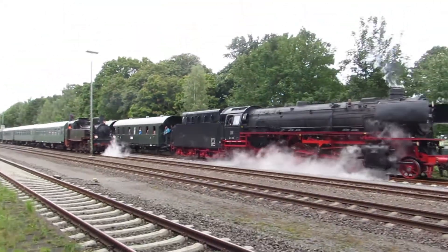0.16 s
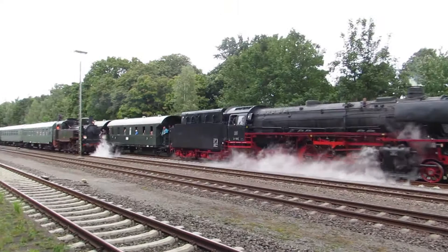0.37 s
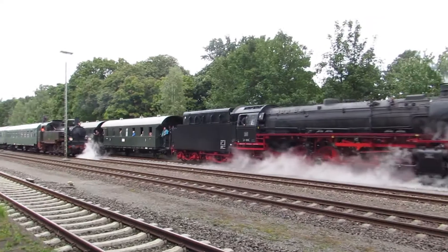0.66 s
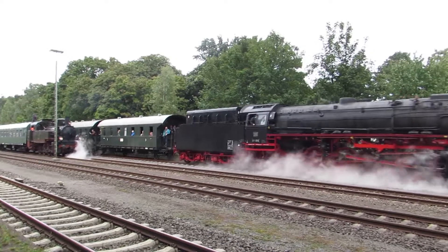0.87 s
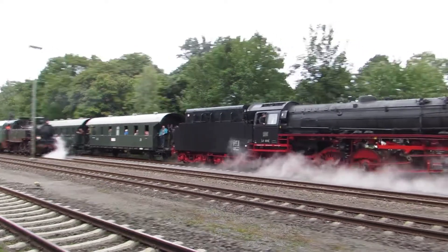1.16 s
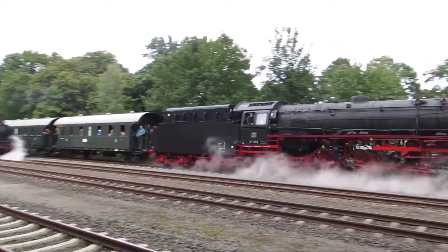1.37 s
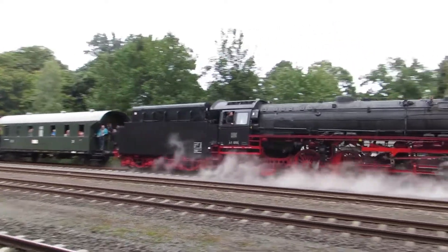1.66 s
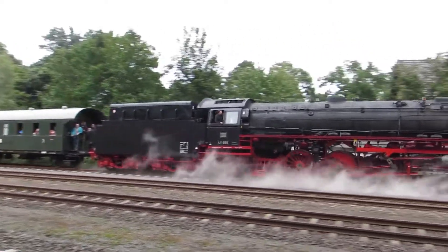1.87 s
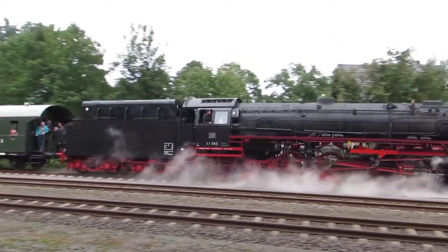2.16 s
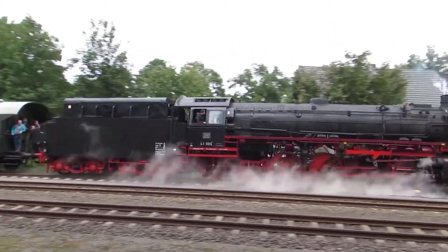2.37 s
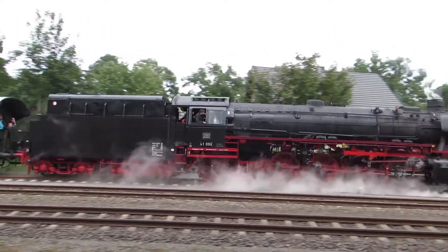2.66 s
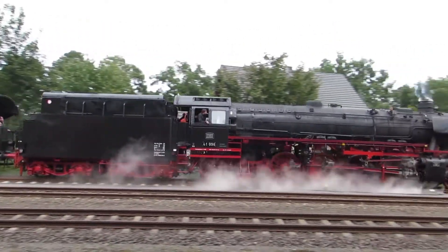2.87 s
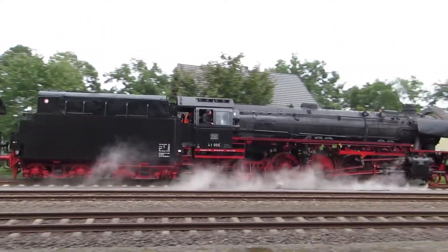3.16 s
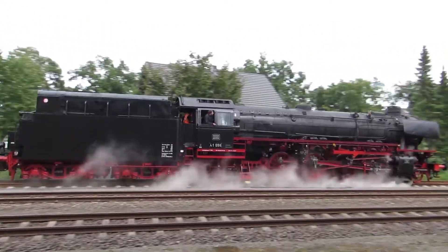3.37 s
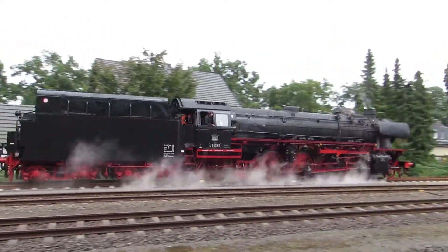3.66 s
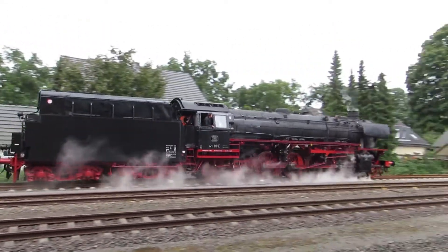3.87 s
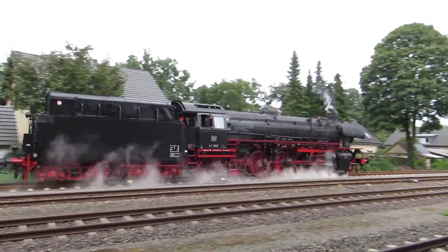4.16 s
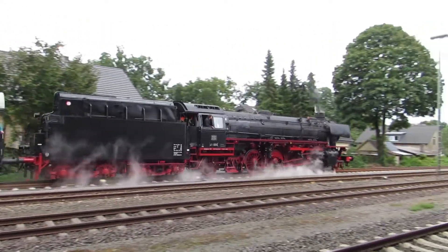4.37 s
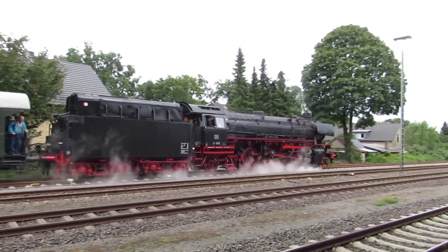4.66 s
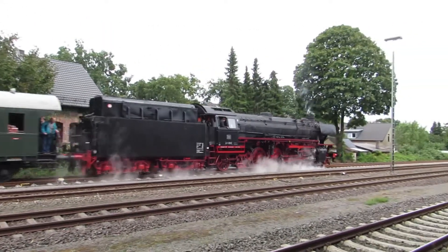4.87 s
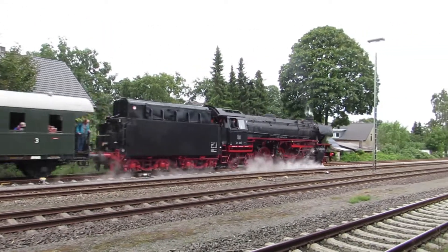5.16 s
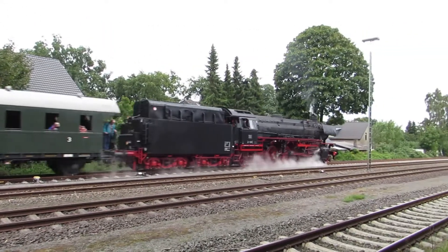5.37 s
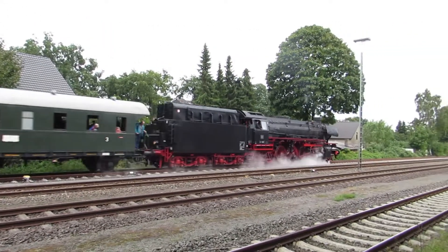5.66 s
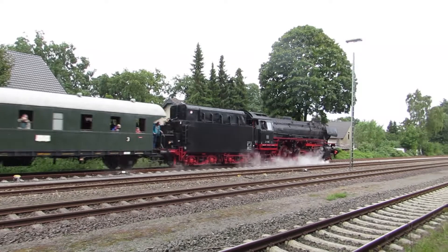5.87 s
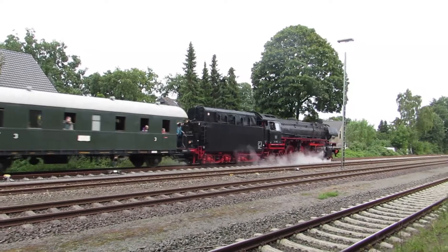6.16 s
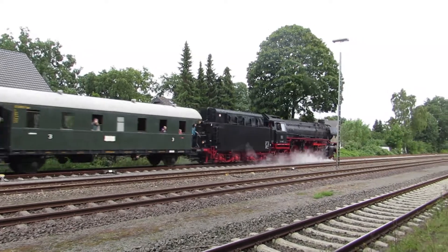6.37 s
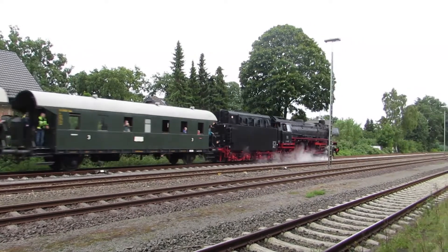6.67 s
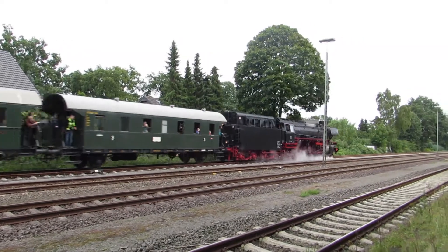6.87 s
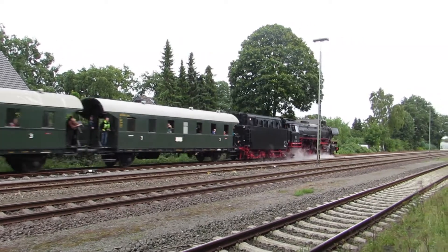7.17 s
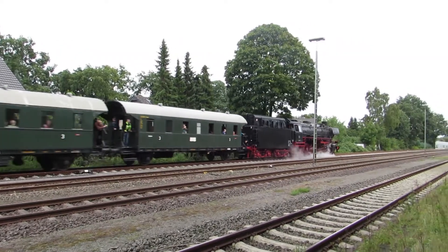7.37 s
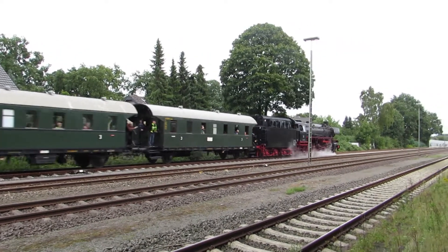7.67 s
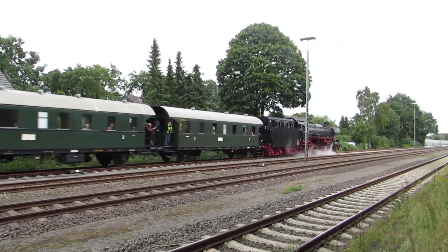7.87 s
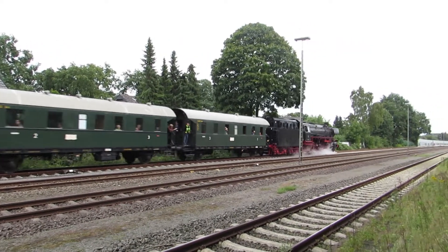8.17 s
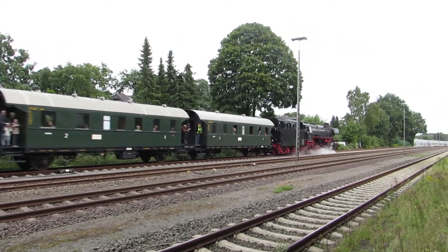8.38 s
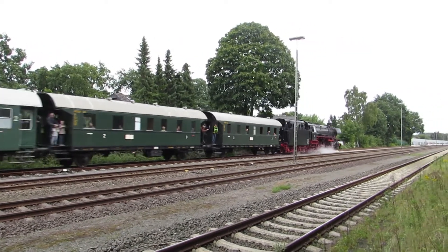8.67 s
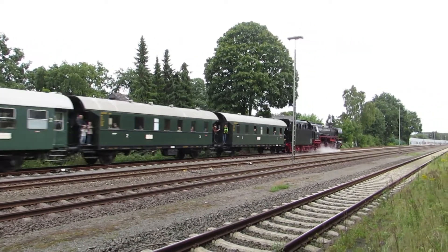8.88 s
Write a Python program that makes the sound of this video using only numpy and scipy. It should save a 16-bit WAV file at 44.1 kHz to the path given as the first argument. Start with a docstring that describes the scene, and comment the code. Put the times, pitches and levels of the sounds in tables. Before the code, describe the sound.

Outdoors beside railway tracks, a steam locomotive passes close and moves away. Deep, hollow chuffs come about six a second, each with a short tearing roar. Leaking steam hisses in waves, with sharp spits on every second chuff. Low wheel rumble builds as coaches follow, with a faint metallic ringing in the later part. A camera microphone hears it brighter on the right, duller on the left.

```python
"""A two-cylinder steam locomotive draws a train past and away across a gravel yard.
Four exhaust chuffs a wheel turn boom in the chimney: each is noise ringing in three notes, under a tearing roar.
Steam leaks and spits at the cylinders as shaped hiss; wheels on rail rumble, sing and ring as filtered noise.
A camera microphone gives the sound on the right and a dull, inverted copy on the left, with faint stray noise."""
import sys
import numpy as np
from scipy import signal
from scipy.fft import rfft, irfft, next_fast_len
from scipy.io import wavfile
from scipy.ndimage import uniform_filter1d

SR = 44100
rng = np.random.default_rng(int(sys.argv[2]) if len(sys.argv) > 2 else 0)


def wav_out(sig):
    """Save sig, one row per channel (or a flat mono array), as 16-bit PCM at SR to the path in sys.argv[1]."""
    wavfile.write(sys.argv[1], SR, np.round(np.clip(np.atleast_2d(sig).T, -1, 1) * 32767).astype(np.int16))


def invert_db(level):
    """Linear amplitude ratio for a level in decibels (20 dB per decade), elementwise."""
    return 10 ** (np.asarray(level, dtype=float) / 20)


N = 397782  # length in samples

# wheels on rail over time: [t/s, rumble level/dB at 120-430 Hz, rail singing level/dB at 1300-1800 Hz,
# ground thunder level/dB at 25-110 Hz]
ROLLING = [(0, -33.5, -53, -36), (0.4, -28, -49.5, -36), (1.6, -28.5, -50.5, -30.5),
           (2.4, -26.5, -48.5, -24.5), (2.9, -27, -47.5, -30), (3.9, -27, -47.5, -26.5),
           (4.4, -27, -45.5, -33), (4.9, -25.5, -43.5, -27), (6, -26, -43, -28.5), (6.7, -24, -39.5, -25),
           (7.2, -26.5, -41, -27), (7.7, -24.5, -40.5, -29.5), (8.4, -24, -38.5, -29),
           (8.9, -20.5, -37, -35)]


def amp_of(points, x):
    """Reads gain from an [f/Hz, level/dB] table on a log frequency axis; silent above its last row."""
    f, db = np.transpose(points)
    return invert_db(np.interp(np.log(x + 1), np.log(f + 1), db, right=-150))


def curve(rows, t, axis=1):
    """Reads one column of a time table, with straight lines between the rows."""
    rows = np.array(rows)
    return np.interp(t, rows[:, 0], rows[:, axis])


def evened(x):
    """Scales to an rms of 1."""
    return x / np.sqrt(np.mean(x ** 2) + 1e-20)


def noise(colour, band, size, patchy_db, extra_db=None):
    """Turbulent noise: random short spectra, shaped by colour, with drifting patches; rms about 1 inside band/Hz."""
    hop = size // 4
    hz = np.fft.rfftfreq(size, 1 / SR)
    t = np.arange(N // hop + 5) * hop / SR
    real, imaginary, patches = rng.standard_normal((len(t), len(hz), 3)).T
    # smoothing over frequency, then over time, joins neighbours into patches
    patches = uniform_filter1d(patches, size=6, axis=0)
    patches = evened(uniform_filter1d(patches, size=8, axis=1))
    shape = amp_of(colour, hz)[:, None]
    if extra_db:
        shape = shape * invert_db(extra_db(hz[:, None], t))
    inside = (hz > band[0]) & (hz < band[1])
    shape = shape / np.sqrt((shape[inside] ** 2).sum(0))
    spectra = (real + 1j * imaginary) * shape * invert_db(patchy_db * patches)
    x = signal.istft(spectra, nperseg=size, noverlap=size - hop)[1][:N]
    whole_over_band = np.sqrt((shape ** 2).sum(0).mean())
    return evened(x) * whole_over_band


def resonance(drive, width_hz):
    """Two equal one-pole filters turn complex noise into the slow wavering of a resonance."""
    r = np.exp(-np.pi * width_hz / SR)
    return signal.lfilter([1], np.convolve([1, -r], [1, -r]), drive)


def burst(hold_s, rise_s, tail_s):
    """A pressure puff: soft rise, a hold counted from its start, then an exponential fall."""
    t = np.arange(round(.3 * SR)) / SR
    rise = np.sin(np.pi / 2 * np.clip(t / rise_s, 0, 1)) ** 2
    return rise * np.exp(-np.maximum(t - hold_s, 0) / tail_s)


def add(mix, s, sound):
    """Mixes a sound in at time s (seconds)."""
    part = mix[max(round(s * SR), 0):][:len(sound)]
    part += sound[:len(part)]


def thunder_and_rumble():
    """The weight of the train shakes the ground and the wheels rumble: two bands of low noise."""
    # relative colour of the ground thunder: [f/Hz, level/dB]
    thunder_colour = [(12, -0.5), (28, 4.5), (45, 2), (62, 10.5), (85, 2), (115, 0.5), (160, -36),
                      (250, -53)]
    # relative colour of the wheel rumble: [f/Hz, level/dB]
    rumble_colour = [(60, -1), (100, -0.5), (140, 2), (200, -4.5), (245, -6), (310, -4), (400, -9),
                     (490, -24), (750, -20), (1000, -23), (1200, -27), (2000, -47)]
    t = np.arange(N) / SR
    thunder = invert_db(curve(ROLLING, t, axis=3)) * noise(thunder_colour, (25, 110), size=4096, patchy_db=2.0)
    rumble = invert_db(curve(ROLLING, t)) * noise(rumble_colour, (120, 430), size=2048, patchy_db=1.0)
    return thunder + rumble


def wheel_ring():
    """A wheel rings as the coaches roll by: a narrow band of noise that slides in pitch."""
    # the ringing note: [t/s, f/Hz, level over the rail singing/dB]
    ring_path = [(5.8, 1593, -12), (6.5, 1592, -4), (6.9, 1565, -10), (7.3, 1580, -9), (7.7, 1640, -4),
                 (8.05, 1654, -6), (8.45, 1650, -8), (9.02, 1613, -4)]
    t = np.arange(N) / SR
    real, imaginary = rng.standard_normal((2, N))
    wavering = resonance(real + 1j * imaginary, width_hz=32)
    phase = 2 * np.pi * np.cumsum(curve(ring_path, t)) / SR
    ring = evened((wavering * np.exp(1j * phase)).real)
    fade_in = np.clip(t - ring_path[0][0], 0, 1)  # over one second from the first row
    return ring * invert_db(curve(ring_path, t, axis=2)) * fade_in


def rails():
    """Rolling wheels make the rails sing: a band of noise, with the wheel ring on top."""
    # relative colour of the singing rails: [f/Hz, level/dB]
    rail_colour = [(900, -25), (1220, -11), (1360, 6), (1450, 2.5), (1530, 6), (1640, 4), (1750, -0.5),
                   (2000, -2.5), (2200, -1), (2550, -3.5), (3000, -8), (3350, -13), (4200, -10)]
    t = np.arange(N) / SR
    singing = noise(rail_colour, (1300, 1800), size=2048, patchy_db=0.84)
    return invert_db(curve(ROLLING, t, axis=2)) * (singing + wheel_ring())


def air_db(hz, s):
    """Distance dulls the hiss: air takes more from the high pitches, with the square of frequency."""
    # air loss as the engine moves: [t/s, loss at 11 kHz/dB]
    air_loss = [(0, 6.5), (3, 6), (5, 6.5), (7, 8.5), (9.1, 9.5)]
    return -curve(air_loss, s) * (hz / 11000) ** 2


def leak_db(t):
    """Leak level over each turn: cut-off, reopening, plateau, swell to a peak, sag, fall to the next cut-off."""
    # one wheel turn a row, levels at 9-13 kHz: [cut-off t/s, cut-off level/dB, reopening level/dB,
    # plateau level/dB, peak level/dB]
    turns = [(-0.3, -51, -45, -51, -41), (0.35, -55, -48, -42.5, -41.5), (1.016, -52.5, -44, -44, -39),
             (1.655, -54, -52.5, -44.5, -39), (2.315, -52, -42.5, -42.5, -40),
             (2.958, -52, -45.5, -45, -41), (3.585, -53, -46.5, -48, -44),
             (4.215, -50.5, -48.5, -47.5, -43), (4.845, -51, -47.5, -46, -44), (5.47, -50.5, -49, -47, -45),
             (6.075, -50.5, -51, -47.5, -44.5), (6.685, -50, -48.5, -49, -48.5),
             (7.29, -52.5, -51, -49, -49), (7.897, -52.5, -52, -50.5, -49),
             (8.48, -51.5, -50.5, -49, -47.5), (9.1, -52, -50, -50, -48)]
    reopen_s, settle_s = 0.034, 0.095  # after the cut-off the leak snaps open, then settles
    swell, top, shoulder = 0.35, 0.55, 0.89  # shares of a turn
    sag = 0.48  # share of the fall done at the shoulder
    knots = []
    for (s, cut, reopen, plateau, peak), (end, next_cut, *_) in zip(turns, turns[1:]):
        turn_s = end - s
        knots += [(s, cut), (s + reopen_s, reopen), (s + settle_s, plateau)]
        knots += [(s + swell * turn_s, plateau), (s + top * turn_s, peak)]
        knots += [(s + shoulder * turn_s, peak + sag * (next_cut - peak))]
    return curve(knots + [turns[-1][:2]], t)


def steam_leak():
    """Steam escapes at the cylinders: a hiss that breathes once a wheel turn."""
    # shape of the hiss, with a steep top edge above 13.6 kHz that is not the steam's own: [f/Hz, level/dB]
    leak_shape = [(900, -1), (1500, -5), (2500, -1), (3500, -2), (4500, 3), (5900, 6.5), (7400, 3.5),
                  (8500, -1), (10500, 6), (12000, 4), (13000, 2), (13600, -5), (13900, -12), (14200, -28),
                  (14800, -50)]

    def colour_db(hz, s):
        """Air dulls the top; when pressure drops the lower hiss dies first."""
        pressure_db = leak_db(s) - uniform_filter1d(leak_db(s), size=450)
        return air_db(hz, s) + 0.091 * pressure_db * np.clip(1 - hz / 9500, 0, 1)

    hiss = noise(leak_shape, (9000, 13000), size=256, patchy_db=0.74, extra_db=colour_db)
    return invert_db(leak_db(np.arange(N) / SR)) * hiss


def steam_spits():
    """Drain cocks spit short jets as a stroke begins: sharp puffs open and close a hiss."""
    # the jets: [t/s, level/dB, length/s]
    spits = [(0.039, -39, 0.045), (0.372, -41, 0.045), (0.702, -35, 0.057), (1.024, -37, 0.069),
             (1.362, -36, 0.045), (1.683, -41, 0.045), (2.009, -31.5, 0.058), (2.322, -39, 0.06),
             (2.658, -35, 0.052), (2.974, -39.5, 0.05), (3.304, -37.5, 0.044), (3.618, -43, 0.054),
             (3.94, -39, 0.061), (4.25, -40, 0.067), (4.562, -40, 0.054), (4.882, -39.5, 0.07),
             (5.186, -35.5, 0.096), (5.496, -38.5, 0.068), (5.814, -37, 0.052), (6.115, -39, 0.062),
             (6.422, -36, 0.053), (6.738, -44, 0.062), (7.033, -39, 0.065), (7.343, -43, 0.054),
             (7.622, -36, 0.094), (7.93, -41.5, 0.04), (8.223, -40, 0.057), (8.523, -50, 0.035),
             (8.813, -44, 0.048)]
    # shape of the hiss of the jets, falling steeply at the top: [f/Hz, level/dB]
    spit_shape = [(1500, -16), (2500, -4.5), (3600, -11), (4600, -3), (5800, -1.5), (7200, -5), (8500, -16),
                  (12000, -6), (15000, -59)]
    gate = np.zeros(N)
    for s, db, length in spits:
        # the puff holds for only part of the length
        add(gate, s - .003, invert_db(db) * burst(0.65 * length, rise_s=0.0081, tail_s=0.013))
    return gate * noise(spit_shape, (4200, 7500), size=256, patchy_db=2.0, extra_db=air_db)


def chimney_note(drive, puff, hz, width_hz, firm):
    """Turbulence rings in one chimney resonance; the flow partly locks to it, so strength follows the puff."""
    slow = resonance(drive, width_hz)[-len(puff):]
    # a larger firm flattens the random swelling of the note
    power = abs(slow) ** 2
    slow = slow / (power + .1 * np.mean(power)) ** (np.clip(firm, 0, 1) / 2)
    x = (slow * np.exp(2j * np.pi * hz * np.arange(len(puff)) / SR)).real * puff
    return x * np.sqrt(np.sum(puff ** 4) / np.sum((x * puff) ** 2))  # same level for every draw


def blast_roar():
    """Steam tears out of the chimney: steady noise whose colour changes with the echo off the ground."""
    # relative colour of the tearing above the chimney notes: [f/Hz, level/dB]
    blast_colour = [(380, -12), (480, -4.5), (560, 1), (720, 2.5), (950, -1), (1150, -11), (1450, -10),
                    (2400, -14.5), (3600, -21), (5000, -18)]
    # the echo hollows the blast while the engine is near and fills in as it recedes:
    # [t/s, f/Hz, depth/dB (negative lifts)]
    hollow = [(0, 477, 3.5), (3.5, 477, 6.5), (4.8, 513, -5.5), (7, 507, -7), (9.1, 496, -1)]

    def hollow_db(hz, s):
        """A dip or lift that reaches half its depth in dB 70 Hz to either side."""
        return -curve(hollow, s, axis=2) / (1 + ((hz - curve(hollow, s)) / 70) ** 2)

    return noise(blast_colour, (500, 1100), size=1024, patchy_db=2.0, extra_db=hollow_db)


def exhaust():
    """Each release of steam up the chimney: two booming notes, a short throaty one and a tearing roar."""
    # the chuffs: [t/s, length/s, tearing blast level/dB, low note level/dB, upper note level/dB]
    chuffs = [(0.049, 0.094, -36.5, -25, -27), (0.222, 0.064, -34.5, -20.5, -23),
              (0.384, 0.059, -34, -19.5, -25), (0.548, 0.048, -34, -17, -20.5),
              (0.713, 0.065, -35, -22.5, -22.5), (0.888, 0.061, -31, -23, -19.5),
              (1.047, 0.048, -30.5, -18.5, -20), (1.207, 0.06, -34, -16.5, -21.5),
              (1.377, 0.045, -31, -19, -19), (1.537, 0.045, -31.5, -12.5, -18.5),
              (1.702, 0.029, -32.5, -16, -21), (1.866, 0.053, -30, -19.5, -19),
              (2.023, 0.031, -29, -14.5, -15.5), (2.19, 0.056, -30, -19.5, -19),
              (2.348, 0.055, -27.5, -15.5, -19.5), (2.51, 0.037, -28, -13.5, -16),
              (2.666, 0.058, -30, -20.5, -17), (2.832, 0.062, -31, -17, -19.5),
              (2.993, 0.073, -30.5, -18.5, -24), (3.158, 0.037, -31.5, -15, -17.5),
              (3.313, 0.055, -30, -17, -23.5), (3.478, 0.057, -31.5, -14, -22.5),
              (3.63, 0.06, -32.5, -19.5, -23.5), (3.795, 0.041, -32.5, -14, -24),
              (3.948, 0.045, -30, -21.5, -24.5), (4.118, 0.036, -30.5, -15.5, -20),
              (4.266, 0.05, -30.5, -20.5, -30.5), (4.423, 0.037, -32.5, -18, -22.5),
              (4.578, 0.056, -30.9, -20.5, -24.5), (4.747, 0.041, -30.5, -14, -27),
              (4.894, 0.053, -31.5, -19, -24.5), (5.052, 0.03, -29, -15, -18.5),
              (5.204, 0.052, -31.5, -13.5, -22.5), (5.367, 0.058, -31.5, -17.5, -28),
              (5.518, 0.03, -32.5, -15.5, -23), (5.683, 0.043, -31.5, -14, -24),
              (5.83, 0.048, -26.5, -12.5, -23.5), (5.986, 0.069, -31.5, -16, -22.5),
              (6.136, 0.059, -31.5, -18, -29), (6.291, 0.042, -29, -16.5, -18),
              (6.438, 0.051, -29, -15.5, -29), (6.6, 0.04, -29, -17, -16.5),
              (6.738, 0.058, -31.5, -16, -24), (6.899, 0.045, -30.5, -14.5, -20.5),
              (7.051, 0.052, -28, -16, -20), (7.199, 0.056, -31, -20.5, -22),
              (7.35, 0.064, -33, -17, -24.5), (7.5, 0.028, -28.5, -17, -18), (7.643, 0.07, -33, -24.5, -28),
              (7.806, 0.041, -31.5, -14, -16.5), (7.942, 0.058, -35, -22.5, -26),
              (8.1, 0.033, -32.5, -31, -19), (8.225, 0.093, -33, -26.5, -23), (8.378, 0.08, -33, -22, -22),
              (8.537, 0.07, -33, -19, -26), (8.681, 0.057, -31, -20, -23),
              (8.831, 0.052, -28.5, -16.5, -23), (8.978, 0.036, -37, -21.5, -16.5)]
    # the chimney notes drift as the engine passes: [t/s, low note f/Hz, upper note f/Hz]
    note_drift = [(0, 170.3, 326.2), (1.7, 188.6, 302.3), (3, 175.9, 305.6), (3.7, 176.3, 341),
                  (4.5, 176.7, 301.2), (5.5, 186.5, 277.7), (7, 185, 282.3), (9.1, 171.3, 290.2)]
    # the throaty note for the four strokes of a turn: [level over the blast/dB]
    throat_strokes = [-9, -13, -12, -13]
    # added to that; clearest abreast of the engine: [t/s, level/dB]
    throat_near = [(0, -1), (2.2, -4), (3.2, 10), (4.2, 0), (5.5, -9), (9.1, 1)]
    throat_hz = 770.3  # before each chuff's scatter
    scatter = 0.0403  # each chuff lands a little off the note (typical share of pitch)
    notes, gate = np.zeros(N), np.zeros(N)
    throat_db = np.resize(throat_strokes, len(chuffs))
    for (s, length, roar_db, low_db, upper_db), over_db in zip(chuffs, throat_db):
        real, imaginary = rng.standard_normal((2, 3, round(.35 * SR)))
        low_drive, upper_drive, throat_drive = real + 1j * imaginary
        low_off, upper_off, throat_off = 1 + scatter * rng.standard_normal(3)
        puff = burst(length, rise_s=0.019, tail_s=0.034)

        low_hz = low_off * curve(note_drift, s)
        low = chimney_note(low_drive, puff, low_hz, width_hz=72.4, firm=0.26)
        add(notes, s - .003, invert_db(low_db) * low)

        upper_hz = upper_off * curve(note_drift, s, axis=2)
        upper = chimney_note(upper_drive, puff, upper_hz, width_hz=94, firm=0.27)
        add(notes, s - .003, invert_db(upper_db) * upper)

        short_puff = burst(.6 * length, rise_s=0.017, tail_s=.02)
        throat = chimney_note(throat_drive, short_puff, throat_off * throat_hz, width_hz=93, firm=.4)
        add(notes, s + 0.00396, invert_db(roar_db + over_db + curve(throat_near, s)) * throat)

        add(gate, s - .004, invert_db(roar_db) * burst(0.8 * length, rise_s=0.025, tail_s=0.051))
    return notes + gate * blast_roar()


def scene():
    """All sources reach the microphone as one signal, the same on both sides."""
    train = thunder_and_rumble() + rails()
    engine = steam_leak() + steam_spits() + exhaust()
    return np.tile(train + engine, (2, 1))


def dull_left(right, hz):
    """Turns the right spectrum into the left copy: inverted, quieter, slightly late and low-passed."""
    gain_db, corner_hz, upper_edge_hz, lag_s = -3.4, 1250, 6000, 9e-6  # lag_s adds to the filter's own delay
    dull = (1 + 1j * hz / corner_hz) * np.sqrt(1 + (hz / upper_edge_hz) ** 6)
    return -invert_db(gain_db) * right * np.exp(-2j * np.pi * hz * lag_s) / dull


def stray_left(sound):
    """A faint left part unrelated to the right: the sound's short spectra with random phases."""
    # gain of this part: [f/Hz, level/dB]
    stray_gain = [(100, -45), (500, -24), (1000, -20), (2000, -17.5), (3300, -16.5), (5000, -20),
                  (7000, -21), (8500, -19), (10500, -23), (15500, -26)]
    bins, _, z = signal.stft(sound, SR, nperseg=256, noverlap=192)
    z = z * amp_of(stray_gain, bins)[:, None] * np.exp(2j * np.pi * rng.random(z.T.shape).T)
    # four overlapping frames of random phase halve the level, so it is doubled
    return 2 * signal.istft(z, nperseg=256, noverlap=192)[1][:N]


def roll_off(x):
    """The treble ends steeply here."""
    return signal.sosfilt(signal.butter(12, 14840, fs=SR, output="sos"), x)


def record(dry):
    """The microphone: right as heard, left dull and inverted with a stray part, narrow dips in both."""
    # the dips: [f/Hz, width/Hz, depth/dB]
    notches = [(3935, 210, 14), (7865, 75, 18)]
    size = next_fast_len(N + 4096)
    hz = np.fft.rfftfreq(size, 1 / SR)
    dips = invert_db(-sum(db / (1 + (2 * (hz - f) / width) ** 2) for f, width, db in notches))
    right = rfft(dry[1], size)
    left = dull_left(right, hz) + rfft(stray_left(dry[1]), size)
    mix = irfft(np.array([left, right]) * dips, size)[:, :N]
    return roll_off(mix)


dry = scene()
out = record(dry)
wav_out(out)
```